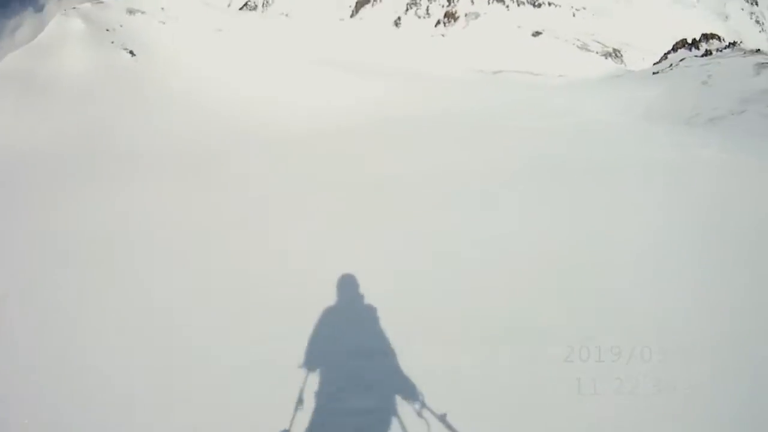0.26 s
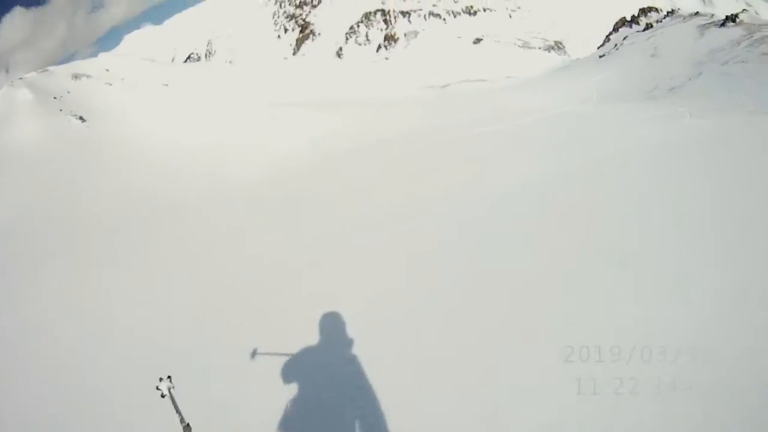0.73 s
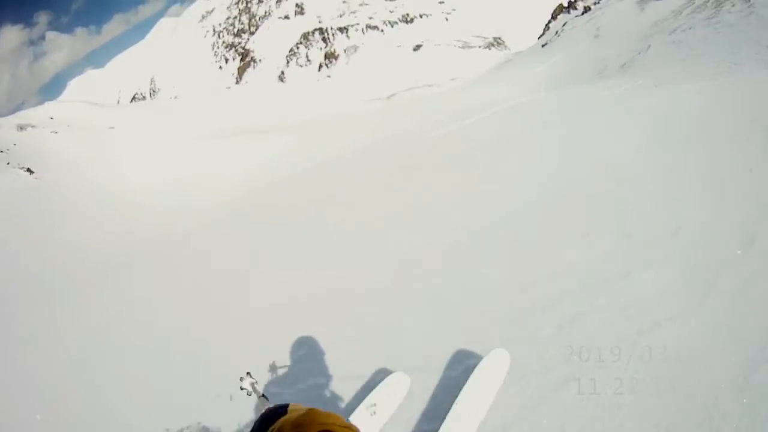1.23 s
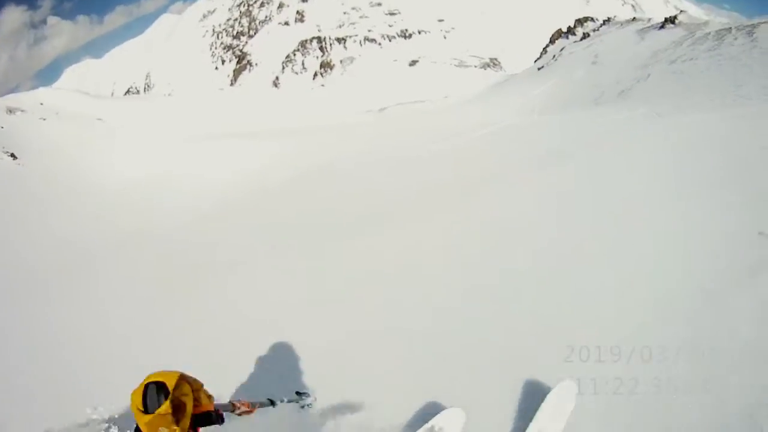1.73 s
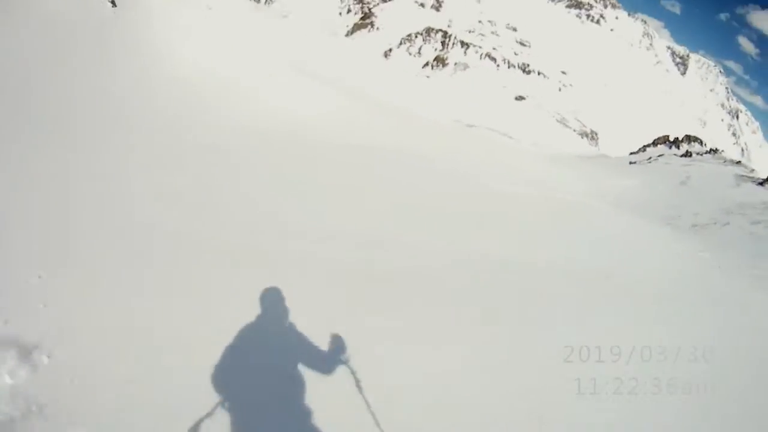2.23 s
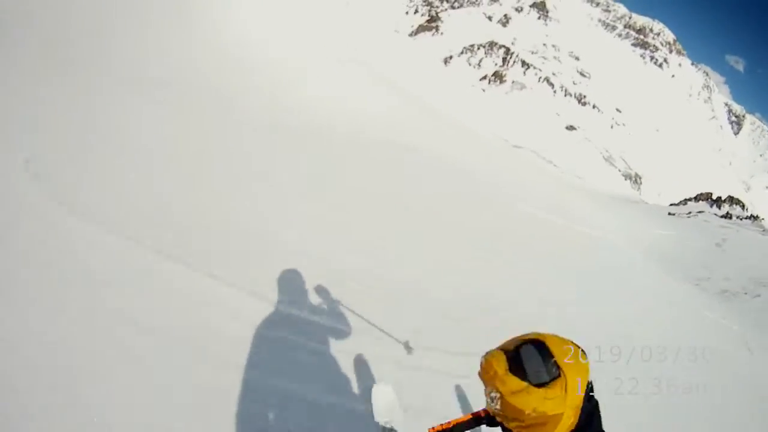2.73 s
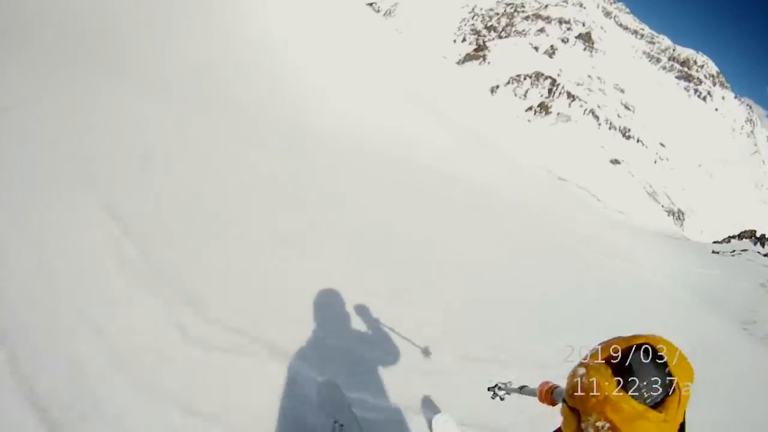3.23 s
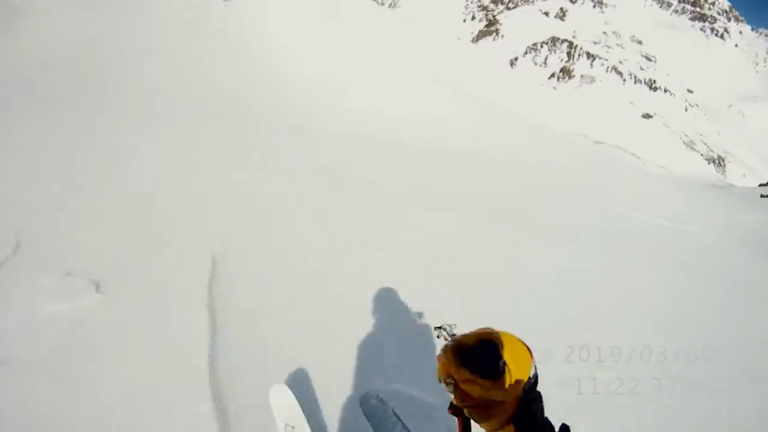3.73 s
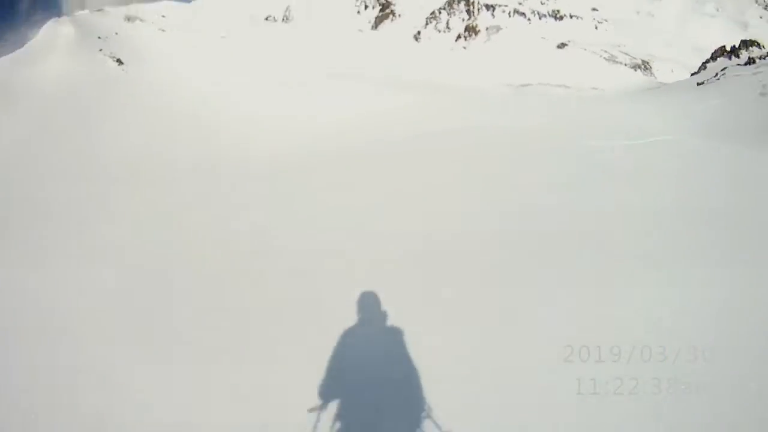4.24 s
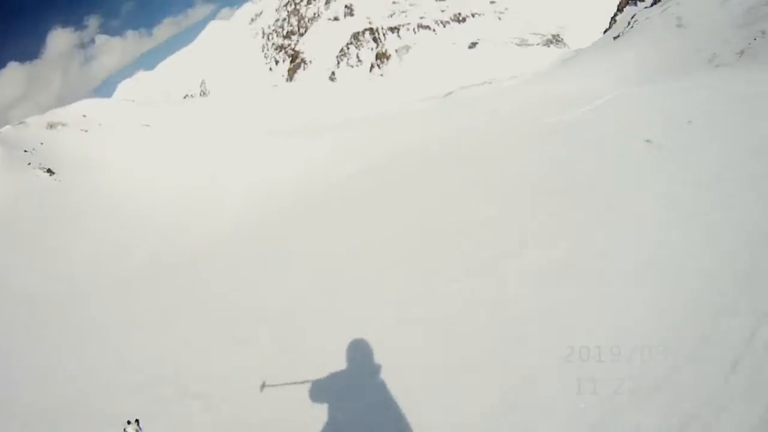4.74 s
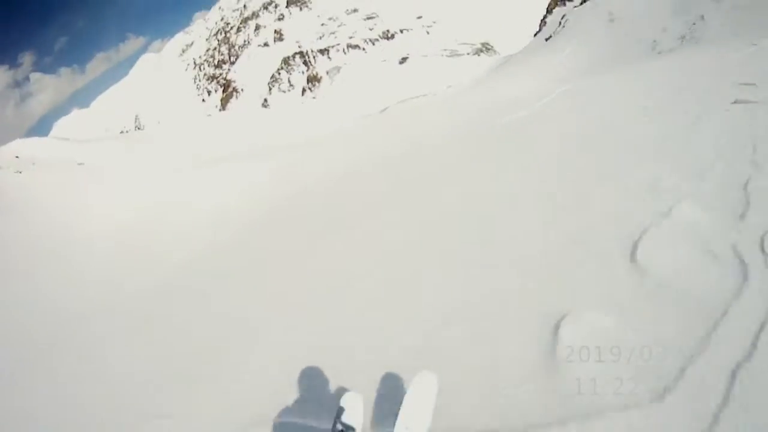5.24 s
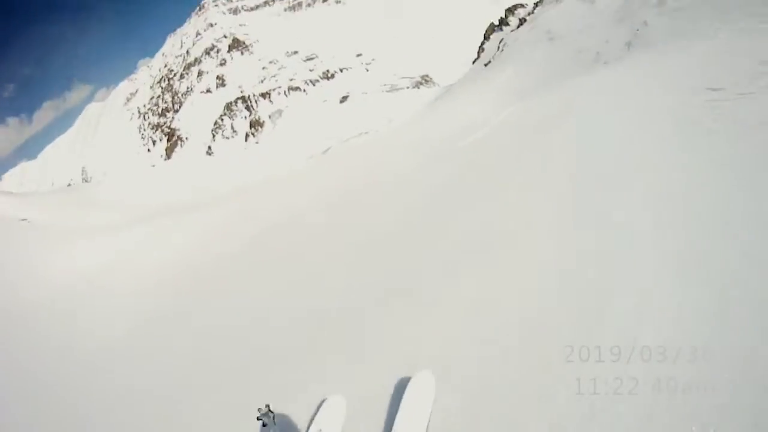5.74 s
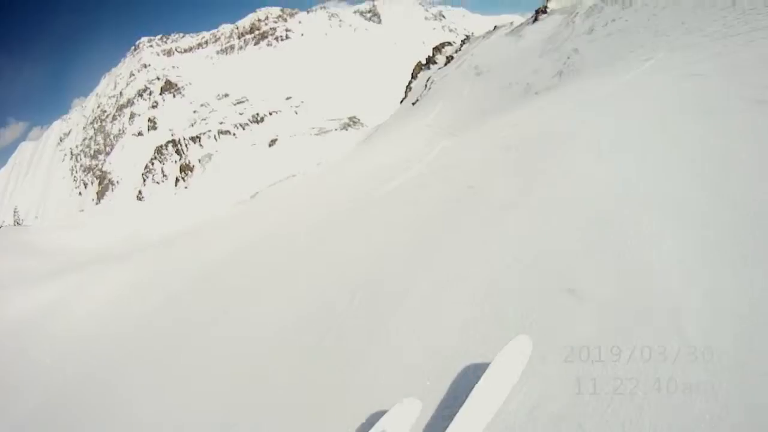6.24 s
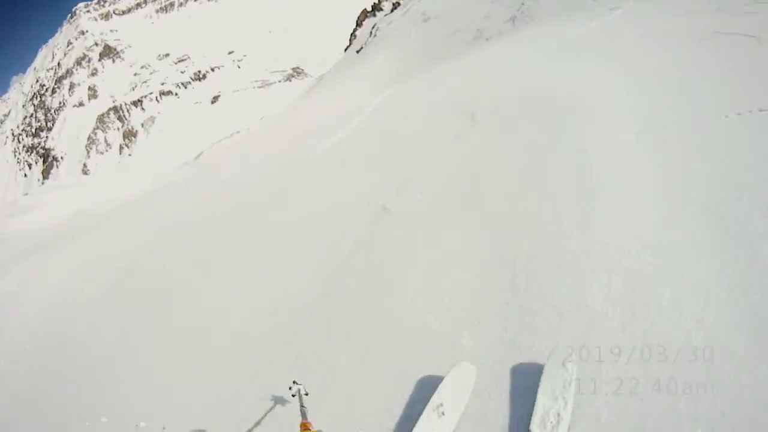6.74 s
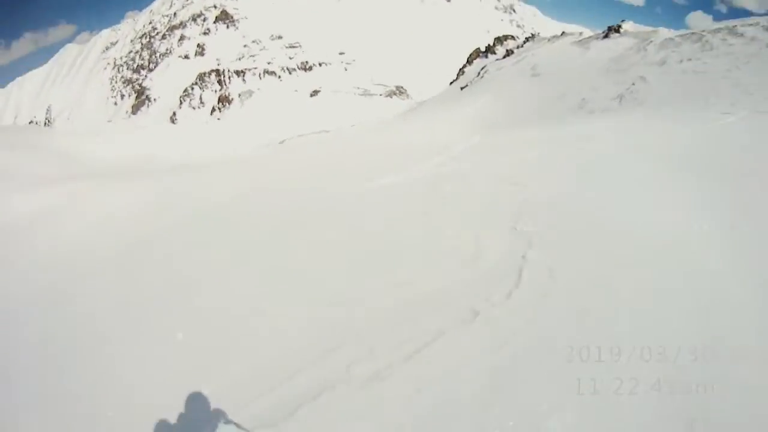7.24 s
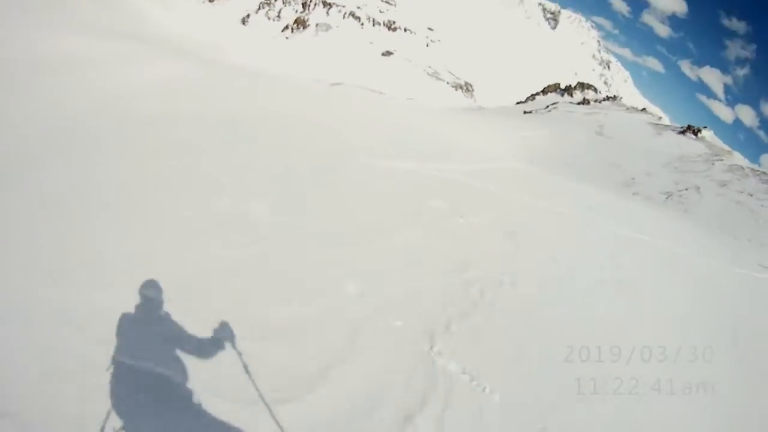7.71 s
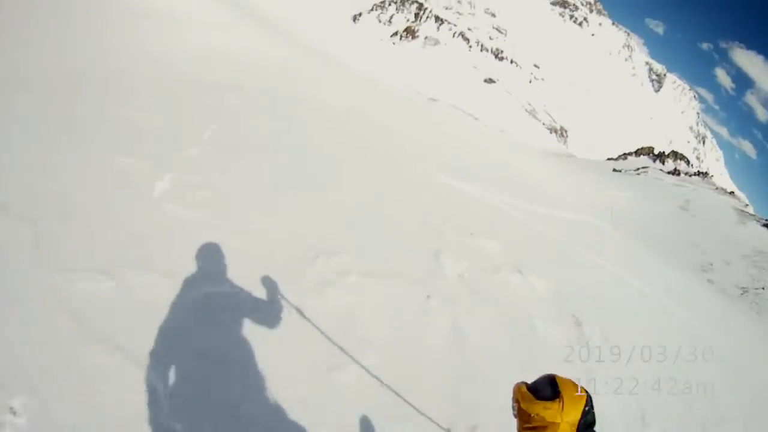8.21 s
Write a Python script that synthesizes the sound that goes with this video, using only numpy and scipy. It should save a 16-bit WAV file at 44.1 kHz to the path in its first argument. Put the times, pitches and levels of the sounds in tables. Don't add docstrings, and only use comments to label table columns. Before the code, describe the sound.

A skier descends soft powder, heard from the helmet through a small, slightly resonant microphone opening. Irregular bursts of bright snow hiss follow the edges, some with a hollow ringing or short gritty scrape. Gusts rumble, flutter and bump beneath. An abrupt cluster of loud pops breaks out near three seconds, then the swishes continue, strongest between five and seven seconds, before softer final turns. Faint electronic hiss stays behind.

```python
import sys
import numpy as np
from scipy import signal
from scipy.fft import rfft, irfft, next_fast_len
from scipy.io import wavfile
from scipy.ndimage import uniform_filter1d

SR = 44100
rng = np.random.default_rng(int(sys.argv[2]) if len(sys.argv) > 2 else 0)


def master(y):
    cut = np.clip(np.atleast_2d(y).T, -1, 1)
    pcm = np.round(cut * 32767)
    wavfile.write(sys.argv[1], SR, pcm.astype(np.int16))


def volts_from_db(level):
    exponent = np.asarray(level, float) / 20
    return 10 ** exponent


N = 373438
TIME = np.arange(N) / SR
SIZE = next_fast_len(N)
HZ = np.maximum(np.arange(SIZE // 2 + 1) * SR / SIZE, 1)

# (start [s], hold [s], load [dB], fade [dB/s],
# dry powder [dB])
EDGE_LOADS = [(0.0, .03, -54.5, 29, 2), (.82, 0.18, -54, 32, -7), (.985, 0.046, -52.5, 10, 0.5),
              (1.455, 0.036, -47.5, 30, -1), (1.545, 0.027, -42.5, 151, -4.5), (1.66, 0.15, -56, 39, 2.5),
              (2.26, 0.15, -62, 85, 2), (2.6, 0.13, -59, 90, 2), (2.78, 0.13, -57.5, 100, -7),
              (3.02, .01, -50, 38, 1), (3.27, 0.054, -47, 118, -3.5), (3.39, .1, -46.5, 92, -1.5),
              (3.635, .03, -44, 69, -2), (3.945, 0.062, -45.5, 31, 0), (4.06, 0.026, -43.5, 60, -3.5),
              (4.55, 0.046, -59.5, 199, -4), (4.81, 0.047, -51.5, 37, 1), (5.055, 0.23, -45, 162, -6),
              (5.15, 0.022, -48.5, 73, 9), (5.34, 0.12, -54, 64, -9), (5.98, 0.0081, -49, 113, 0.5),
              (6.095, 0.023, -48, 108, -2.5),
              (5.007, 0.12, -50, 100, 0),
    (1.72, 0.035, -59, 200, 0),
    (6.89, 0.25, -48, 16, -2.5),
    (7.56, 0.13, -53, 121, -9.5),
    (8.0, 0.16, -55, 28, 0),
    (8.195, 0.068, -52.5, 53, 3.5),
    (8.438, .05, -48.5, 60, -1.5),
]
# (start [s], hold [s], load [dB], fade [dB/s], dry powder [dB])
EDGE_SLAMS = [
    (5.643, 0.09, -42, 184, -5),
    (5.797, 0.029, -46, 121, -0.5),
    (6.208, 0.46, -45.5, 43, 0),
    (6.779, 0.0096, -45, 200, -1),
    (6.83, 0.0086, -47.5, 168, -4),
]
# (frequency [Hz], density [dB per Hz])
SPRAY_SPECTRUM = [(300, -15), (700, -6.5), (1500, -6.5), (2500, -10), (3300, -9), (4600, -11.5),
                  (5280, -13), (6260, -12.5), (6930, -16.5), (9900, -17), (11000, -17), (11700, -20.5),
                  (13000, -17.5), (15400, -22)]
# (frequency [Hz], width [Hz], level [dB])
PORT_MODES = [
    (4600, 700, -6),
    (5280, 700, 0),
    (5950, 450, -3),
]
# (time [s], level [dB])
PORT_FACING = [(0, -6.5), (.98, 2.5), (1.5, -5), (2.5, -5), (3.3, -6), (4.0, 0.5), (4.85, 0.5), (5.7, 1),
               (6.0, -2), (6.6, -3.5), (7.5, -2), (8.15, -2), (8.27, 1), (8.47, -2)]
# (frequency [Hz], width [Hz], level [dB])
HOUSING_MODES = [
    (1047, 63, 8),
    (1214, 65, 6),
    (1337, 260, -2),
]
# (time [s], shift [Hz])
MODE_SHIFT = [
    (0, 0),
    (6.5, 0),
    (6.799, -35),
    (7.0, -25),
    (7.15, -5),
    (7.4, 20),
    (7.65, 40),
    (8.0, 0),
    (8.47, 0.5),
]
# (start [s], hold [s], strength [dB], fade [dB/s], upper over lower mode [dB])
WHISTLES = [(.56, .02, -50, 150, -1), (1.43, .04, -48, 50, 0), (2.6, .15, -56, 50, 1),
            (4.97, .04, -53, 98, 6), (3.22, 0.23, -46.5, 100, -2), (4.12, 0.073, -44.5, 200, 4),
            (4.53, .1, -53, 24, 1), (6.79, 0.05, -45.5, 60, 3), (6.9, 0.21, -44, 29, 0),
            (7.2, 0.11, -48, 18, -1), (7.58, 0.1, -47.5, 120, 11), (7.98, 0.14, -50.5, 36, -3)]
# (start [s], length [s], rms level [dB], pitch [Hz])
CRUST_SCRAPES = [
    (5.80, 0.068, -48, 3100),
    (6.08, 0.056, -51, 1900),
    (8.27, 0.066, -51, 2400),
    (6.075, 0.076, -41.5, 620),
    (7.05, 0.14, -49.5, 650),
    (.565, 0.02, -52, 1800),
    (8.4, 0.11, -49, 610),
]
# (start [s], hold [s], strength [dB], fade [dB/s], small eddies [dB])
GUSTS = [(0.0, 0.033, -55, 116, 1), (.46, 0.14, -53, 60, -3.5), (.85, 0.36, -43.5, 43.5, -6.5),
         (1.5, 0.084, -43, 25, -3), (2.07, 0.045, -45.5, 151.5, -16), (2.24, 0.019, -45.5, 117, -12),
         (2.39, 0.15, -45.5, 3, -7.5), (2.65, 0.061, -46.5, 40, -8.5), (2.77, 0.023, -36.5, 300, -10.5),
         (2.87, .15, -51.5, 20, 2), (3.205, 0.029, -38, 150, -9.5), (3.3, 0.092, -48.5, 47.5, 5),
         (3.57, 0.059, -51, 62, 5), (3.92, 0.019, -53, 297, 4), (4.13, .05, -59.5, 88, -3),
         (4.42, .03, -49, 30, -17), (4.53, 0.092, -45, 21, -14.5), (4.76, 0.65, -45, 19.5, -1.5),
         (5.65, 0.13, -39.5, 200, -0.5), (5.88, 0.16, -45, 213, -2.5), (6.2, 0.17, -41.5, 44.5, -9.5),
         (6.71, 0.011, -50, 300, 9.5), (7.65, 0.04, -48, 6, -4), (7.95, 0.36, -41.5, 24, -5.5),
         (0.094, 0.053, -52, 200, -20), (.64, 0.11, -53.5, 40, -9), (4.27, .06, -56.5, 63, 6),
         (4.55, 0.081, -49.5, 103, 7), (4.88, .1, -53, 60, 8), (5.02, 0.051, -44.5, 60, 12),
         (3.45, 0.038, -49.5, 100, 6), (3.023, 0.021, -40, 301, -7.5), (5.14, .03, -45, 202, -12),
         (6.502, .09, -47.5, 147, -4), (7.243, 0.39, -59, 57, 3), (8.082, 0.097, -47, 91, 4)]
# (frequency [Hz], density [dB per Hz])
RUMBLE_SPECTRUM = [(40, -21), (65, 1.5), (100, -1), (160, -2.5), (240, -3.5), (400, -21)]
# (frequency [Hz], density [dB per Hz])
FLUTTER_SPECTRUM = [(180, -12), (300, 1), (480, 0), (750, -5.5), (1100, -16), (1800, -24)]
# (frequency [Hz], density [dB per Hz])
SWAY_SPECTRUM = [(16, -1.5), (28, -5.5), (42, 3), (60, -12), (90, -26)]
# (time [s], level [dB])
HEAD_EXPOSURE = [(0, 1), (.5, 0.5), (.8, 4), (1.3, 1.5), (1.45, 0.5), (1.75, 2), (2.0, -1), (2.6, 2),
                 (3.3, -0.5), (3.7, -1.5), (3.95, -7), (4.6, -3.5), (4.85, 1.5), (5.3, -0.5), (5.95, 1.5),
                 (6.1, -3), (6.7, -0.5), (8.47, -1.5)]
# (start [s], length [s], rms level [dB], corner frequency [Hz])
PORT_SLAPS = [
    (2.783, 0.028, -36, 700),
    (2.848, 0.0144, -47, 1600),
    (3.033, 0.026, -37, 600),
    (3.078, 0.021, -32, 700),
    (3.095, 0.0079, -28, 1900),
    (3.103, 0.051, -34.5, 1090),
    (3.157, 0.04, -35, 900),
]
# (time [s], peak level
# [dB], width [ms], direction [sign])
EDDY_POPS = [(.3007, -41, .5, 1), (.3024, -41, .7, -1), (.306, -40, .4, -1), (.584, -27, .55, 1),
             (.5851, -27, .6, -1), (.587, -36, .6, 1), (.862, -27, 1.8, 1), (0.871, -28, 1.1, -1),
             (0.889, -26, 0.94, -1), (1.307, -32, 1, 1), (2.397, -33, 0.82, -1), (2.723, -22, 1.05, 1),
             (5.554, -30, 0.22, 1), (5.559, -33, .25, -1), (2.7868, -21, .4, -1), (2.7885, -20, .38, -1),
             (2.7901, -15, .75, 1), (2.7918, -24, .5, 1), (2.7941, -18, .4, -1), (2.7954, -23, .28, -1),
             (2.7963, -20, .28, -1), (2.798, -15, .47, 1), (2.7995, -26, .5, -1), (2.8026, -14, .5, -1),
             (2.8049, -19, .65, 1), (2.848, -33, .22, -1), (2.8504, -32, .3, 1), (2.8522, -32, .3, -1),
             (3.0388, -26, .55, -1), (3.0433, -24, .45, -1), (3.0467, -23, .45, -1), (3.0482, -14, .55, 1),
             (3.0489, -12, .35, -1), (3.0505, -21, .42, 1), (3.0537, -26, .5, -1), (3.0556, -21, .52, 1),
             (3.4195, -14, .3, -1), (3.423, -28, .8, 1), (3.4247, -27, .5, -1), (3.4265, -31, .45, -1),
             (3.0827, -20, .45, -1), (3.0837, -11, .3, 1), (3.0856, -12.5, .24, 1), (3.09, -21, .5, -1),
              (3.0921, -14, .2, 1), (3.0926, -15, .16, -1), (3.0929, -16, .15, 1), (3.0934, -19, .22, -1),
              (3.0944, -9, .3, 1), (3.095, -17, .3, 1), (3.0957, -17, .15, 1), (3.0973, -17, .17, 1),
              (3.096, -13, .15, -1), (3.0964, -11, .12, 1), (3.0979, -4.5, .3, -1), (3.0984, -13, .1, 1),
              (3.09893, -.5, .16, 1), (3.0994, -7, .22, -1), (3.1029, -17, .13, 1), (3.1066, -22, .45, 1),
              (3.1081, -23, .22, -1), (3.1089, -21, .55, 1), (3.1106, -20, .5, -1), (3.1232, -21, .5, -1),
              (3.1246, -12, .26, -1), (3.128, -21, .65, 1), (3.1376, -19, .42, -1), (3.1418, -20, .85, 1),
              (3.1442, -23, .5, -1), (3.1551, -21, .4, 1), (3.1662, -16, .55, 1), (3.1674, -21, .33, -1),
              (3.1685, -19, .2, -1), (3.1717, -17, .38, -1), (3.1732, -11, .5, 1), (3.1746, -22, .7, -1),
              (3.1764, -12, .4, -1), (3.1818, -21, .37, 1), (3.1827, -20, .37, -1), (3.1835, -21, .3, 1),
              (3.1846, -11, .4, -1), (3.1866, -14, .32, 1), (3.1879, -7, .27, 1), (3.1892, -10, .36, -1),
              (3.1899, -17, .26, 1), (3.1913, -20, .42, -1)]
# (time [s], peak level [dB], width [ms], direction [sign])
AIR_THUDS = [(.11, -36, 2.8, 1), (.355, -40, 1, -1), (1.208, -29, 2.3, 1), (1.511, -34, 1.7, -1),
             (1.6, -39, 1.8, 1), (1.641, -35, 1.3, -1), (2.098, -33, 1.4, -1), (2.258, -28.5, 2.5, 1),
             (2.415, -38, 0.66, -1), (3.645, -37, 1.7, 1), (4.163, -41, 1.3, -1), (4.838, -37, 1.2, -1),
             (5.037, -27, 0.8, 1), (5.309, -33.5, 1.2, -1), (5.743, -25, 1.7, -1), (5.895, -38, 1.4, -1),
             (5.97, -33, 2.4, -1), (7.93, -27, 1.5, -1), (8.089, -35, 1.2, 1)]
# (time [s], peak level [dB], pitch [Hz])
POP_CRACKS = [(1.715, -30, 3500), (2.3, -30, 2100), (3.4187, -37, 1400), (3.185, -31, 3000),
              (3.4, -28, 2800), (3.094, -23, 4400), (3.0966, -22, 4900), (3.0974, -23, 4500),
              (3.0983, -18.5, 4300), (3.0988, -21, 5200), (2.8, -33, 2600), (3.1245, -34, 1900),
              (2.3, -38, 1100), (3.103, -32, 4900), (3.4, -32, 3000), (3.1585, -32, 4100),
              (3.169, -33, 1800), (3.1878, -26.5, 2400), (3.0487, -30, 1800), (5.725, -25, 5200),
              (6.785, -26, 5000), (8.19, -25, 4800)]
# (time [s], peak level [dB])
HOUSING_TAPS = [
    (1.714, -37.5),
    (5.658, -34),
    (5.666, -39),
    (6.779, -43),
    (6.843, -46.5),
]
# (frequency [Hz], density [dB per Hz])
SELF_NOISE_SPECTRUM = [(200, -19), (2000, -9), (5000, -2), (8000, -1), (11000, -2), (15000, -7)]


def rms_one(x):
    return x / np.sqrt(np.mean(x ** 2) + 1e-20)


def at_hz(points, hz):
    table = np.array(points)
    return np.interp(np.log(hz), np.log(table[:, 0]), table[:, 1])


def over_time(points):
    return np.interp(TIME, *np.transpose(points))


def both(a_db, b_db):
    return 20 * np.log10(np.hypot(volts_from_db(a_db), volts_from_db(b_db)))


def swells(rows, rise_db_per_s):
    t = np.arange(0, N + 64, 64) / SR
    start, hold, db, fade, extra = np.transpose(rows)[:, :, None]
    rise_db = rise_db_per_s * np.maximum(start - t, 0)
    fade_db = np.abs(fade) * np.maximum(t - start - hold, 0)
    power = volts_from_db(db - rise_db - fade_db) ** 2 + 1e-12
    total = power.sum(0)
    level_db = np.interp(TIME, t, 10 * np.log10(total))
    return level_db, np.interp(TIME, t, (power * extra).sum(0) / total)


def drift(rate):
    r = np.exp(-80 * np.pi * rate / SR)
    slow = signal.lfilter([1], [1, -2 * r, r * r], rng.standard_normal(N // 40 + 2002))[2000:]
    return np.interp(np.arange(N) / 40, np.arange(len(slow)), rms_one(slow))


def grains(per_s, spread_db):
    sizes = volts_from_db(spread_db * np.minimum(rng.exponential(1, N), 5)) * rng.choice([-1, 1], N)
    return rms_one(sizes * (rng.random(N) < per_s / SR) + 1e-18)


def coloured(x, spectrum, shared_db, own_db, rate):
    shaped = rfft(x, SIZE) * volts_from_db(at_hz(spectrum, HZ)) * (HZ > spectrum[0][0] / 2)
    octave = np.log2(HZ)
    together = drift(rate)
    out = 0
    lowest, highest = np.floor(np.log2(spectrum[0][0])), np.log2(spectrum[-1][0])
    for centre in np.arange(lowest, highest + 1):
        window = np.cos(np.pi / 2 * np.clip(octave - centre, -1, 1)) ** 2
        flicker_db = shared_db * together + own_db * drift(rate * 2)
        out = out + irfft(shaped * window, SIZE)[:N] * volts_from_db(flicker_db)
    return rms_one(out)


def resonate(x, hz, width):
    r = np.exp(-np.pi * width / SR)
    gain = (1 - r * r) / 2
    return signal.lfilter([gain, 0, -gain], [1, -2 * r * np.cos(2 * np.pi * hz / SR), r * r], x)


def resonate_twice(x, hz, width):
    return resonate(resonate(x, hz, width), hz, width)


def spray(coarse_db, fine_db, song_db):
    shower = coloured(grains(20000, spread_db=2.5), SPRAY_SPECTRUM, shared_db=0.45, own_db=1.15, rate=8.9)
    fine = signal.sosfiltfilt(signal.butter(4, 8000, "high", fs=SR, output="sos"), shower)
    coarse = shower - fine
    puffs = grains(15000, spread_db=3.5) * volts_from_db(2.7 * drift(16.0))
    port = 0
    for k, (hz, width, db) in enumerate(PORT_MODES):
        port = port + (-1) ** k * volts_from_db(db) * resonate_twice(puffs, hz, width * 1.5)
    port = signal.sosfilt(signal.butter(6, 6350, fs=SR, output="sos"), port)
    glide = volts_from_db(-56)
    coarse_level = np.hypot(volts_from_db(coarse_db + 0.78), glide)
    fine_level = np.hypot(volts_from_db(fine_db + 0.5), volts_from_db(-4.5) * glide)
    return coarse_level * rms_one(coarse) + fine_level * rms_one(fine) + volts_from_db(song_db - 3.0) * rms_one(port)


def housing(level_db, tilt_db):
    shake = grains(5000, spread_db=3.5) * volts_from_db(2.2 * drift(29.0))
    rings = 0
    for (hz, width, db), lean in zip(HOUSING_MODES, (-.5, .5, 0)):
        ring = resonate_twice(shake, hz, width * 1.8)
        rings = rings + volts_from_db(db + lean * tilt_db + 0.54 * drift(5.4)) * ring
    turning = np.exp(2j * np.pi * np.cumsum(over_time(MODE_SHIFT)) / SR)
    moved = signal.hilbert(rms_one(rings), SIZE)[:N] * turning
    flicker = np.sqrt(uniform_filter1d(np.abs(moved) ** 2, size=900))
    return volts_from_db(level_db - 5.0) * rms_one(moved.real / flicker ** 0.3)


def scrapes():
    out = np.zeros(N)
    for start, length, db, hz in CRUST_SCRAPES:
        grit = rng.standard_normal(6000)
        swell = np.sin(np.pi * np.clip(np.arange(6000) / SR / length, 0, 1))
        scrape = volts_from_db(db) * swell * rms_one(resonate_twice(grit, hz, 0.51 * hz))
        at = round(start * SR)
        out[at:at + 6000] += scrape[:N - at]
    return out


def wind(rumble_db, flutter_db):
    rumble = coloured(grains(500, spread_db=3.0), RUMBLE_SPECTRUM, shared_db=0.8, own_db=0.2, rate=6.5)
    flutter = coloured(grains(1500, spread_db=1.0), FLUTTER_SPECTRUM, shared_db=0.6, own_db=2.0, rate=5.4)
    heaves = rng.standard_normal(N) ** 3 * volts_from_db(1.2 * drift(12.0))
    sway = coloured(heaves, SWAY_SPECTRUM, shared_db=1.5, own_db=-0.5, rate=4.8)
    sway_db = -52.5 + 0.44 * (uniform_filter1d(rumble_db, size=8000) + 47.0)
    exposed_db = over_time(HEAD_EXPOSURE)
    sway = volts_from_db(exposed_db) * sway
    rumble = volts_from_db(0.4 * exposed_db) * rumble
    breeze = volts_from_db(-63.5)
    rumble_level = np.hypot(volts_from_db(rumble_db - 1.5), breeze)
    flutter_level = np.hypot(volts_from_db(flutter_db + 0.1), breeze)
    return rumble_level * rumble + flutter_level * flutter + volts_from_db(sway_db) * sway


def slaps():
    out = np.zeros(N)
    t = np.arange(4000) / SR
    soft = signal.butter(1, 3000, fs=SR, output="sos")
    for start, length, db, corner_hz in PORT_SLAPS:
        kicks = rng.standard_normal(4000) * (rng.random(4000) < 2.5 * corner_hz / SR)
        shape = np.clip(t / (0.16 * length), 0, 1) * np.clip((length - t) / 0.0025, 0, 1)
        band = signal.butter(2, [90, corner_hz], "band", fs=SR, output="sos")
        burst = signal.sosfilt(np.vstack([band, soft]), kicks * shape)
        at = round(start * SR)
        out[at:at + 4000] += volts_from_db(db) * rms_one(burst) * np.sqrt(length * SR / 4000)
    return out


def pops():
    out = np.zeros(N)
    ms = np.arange(-600, 600) / SR * 1000
    for s, db, width, direction in EDDY_POPS + AIR_THUDS:
        u = ms / width
        swing = 0.5 + 0.65 * np.exp(db / 6)
        push_pull = np.cos(1.33 * swing * u + 0.18)
        point = np.exp(1 - np.sqrt(1 + 2.0 * u * u))
        at = round(s * SR)
        out[at - 600:at + 600] += np.sign(direction) * volts_from_db(db) * push_pull * point
    return signal.sosfilt(signal.butter(1, 40, "high", fs=SR, output="sos"), out)


def cracks():
    out = np.zeros(N)
    click = np.eye(1, 200)[0]
    for s, db, hz in POP_CRACKS:
        snap = resonate_twice(click, hz, 1.2 * hz)
        snap = signal.sosfilt(signal.butter(2, 1.3 * hz, fs=SR, output="sos"), snap)
        at = round(s * SR)
        out[at:at + 200] += volts_from_db(db) * snap / np.abs(snap).max()
    return out


def taps():
    clicks = np.zeros(N) + 1e-18
    for s, db in HOUSING_TAPS:
        clicks[round(s * SR)] = volts_from_db(db)
    rings = sum(volts_from_db(db) * resonate(clicks, hz, 69) for hz, _, db in HOUSING_MODES)
    return 60 * rings + 4.0 * resonate(clicks, 3900, 900)


def whine():
    level = volts_from_db(-72 + 1.1 * drift(4.0))
    pitch_hz = 11089 + 4.3 * drift(3.6)
    return level * np.sin(2 * np.pi * np.cumsum(pitch_hz) / SR)


def self_noise():
    white = rfft(rng.standard_normal((2, SIZE)))
    return volts_from_db(-64.5) * rms_one(irfft(white * volts_from_db(at_hz(SELF_NOISE_SPECTRUM, HZ)), SIZE)[:, :N])


def scene():
    gentle = EDGE_LOADS
    rise_db_per_s = np.repeat([226, 800], [len(gentle), len(EDGE_SLAMS)])[:, None]
    load_db, powder_db = swells(gentle + EDGE_SLAMS, rise_db_per_s)
    gust_db, eddies_db = swells(GUSTS, 139)
    whistle_db, tilt_db = swells(WHISTLES, 200)
    ski_ring_db = -45 - 1.0 + 2 * (load_db + 45) - 0.71 * (powder_db + 6.5)
    ring_db = both(whistle_db, ski_ring_db)
    flutter_db = both(gust_db + eddies_db, load_db - 6.5)
    fine_db = load_db + powder_db
    snow = spray(load_db, fine_db, fine_db + over_time(PORT_FACING)) + housing(ring_db, tilt_db) + scrapes()
    air = wind(gust_db, flutter_db) + slaps() + pops() + cracks() + taps()
    mono = snow + air + whine()
    return np.array([mono, mono])


def band_limit(x):
    return signal.sosfilt(signal.butter(12, 15770, fs=SR, output="sos"), x)


def record(dry):
    loudness = np.sqrt(uniform_filter1d(dry[0] ** 2, size=200) + 1e-12)
    noise = rng.standard_normal(N) * np.array([[1], [-1]])
    error = signal.sosfilt(signal.butter(1, 1800, fs=SR, output="sos"), noise)
    rounded = 1.348 * np.tanh(dry / 1.269)
    wet = rounded + self_noise() + volts_from_db(-7.5) * loudness ** 1.41 * error
    wet = signal.sosfilt(signal.ellip(14, .5, 70, 15290, fs=SR, output="sos"), wet)
    return band_limit(wet)


dry = scene()
out = record(dry)
master(out)
```